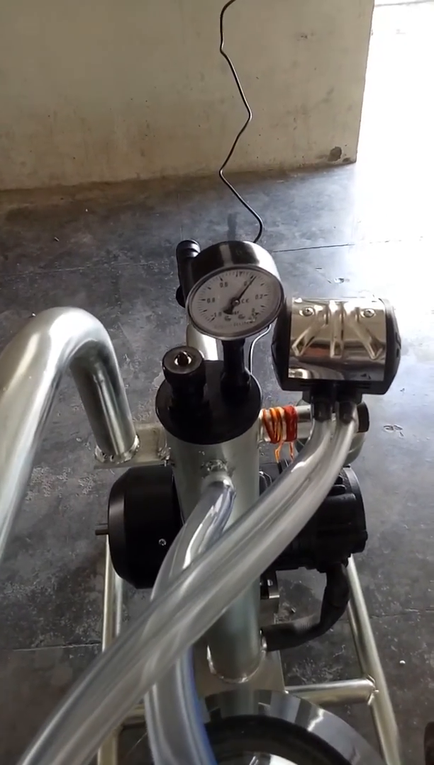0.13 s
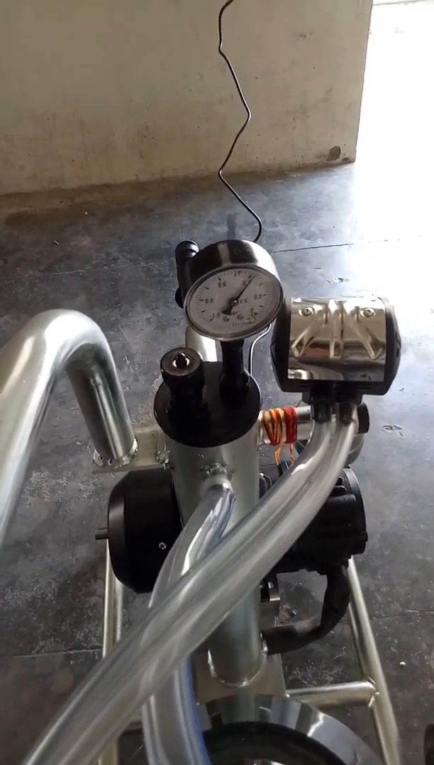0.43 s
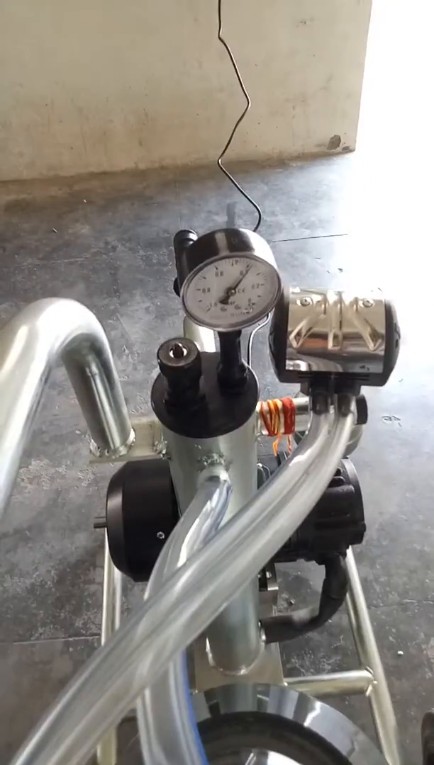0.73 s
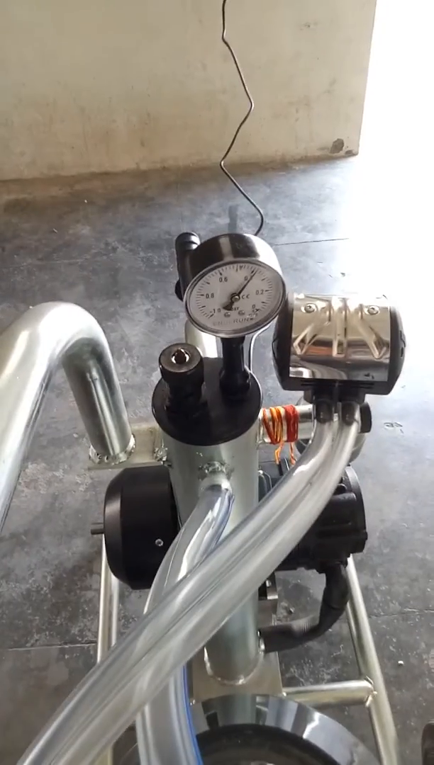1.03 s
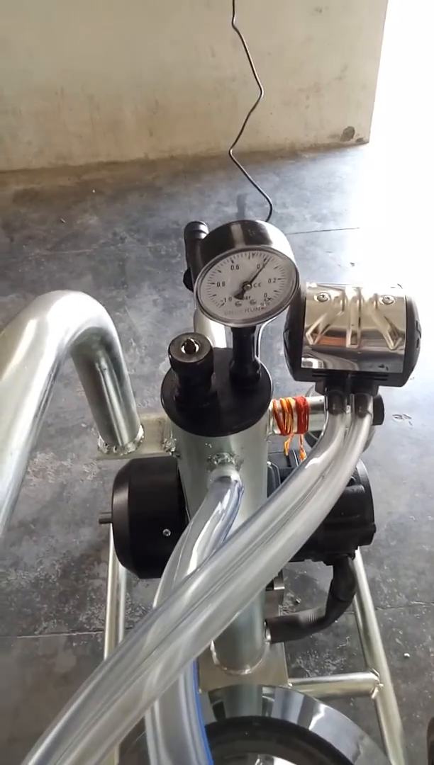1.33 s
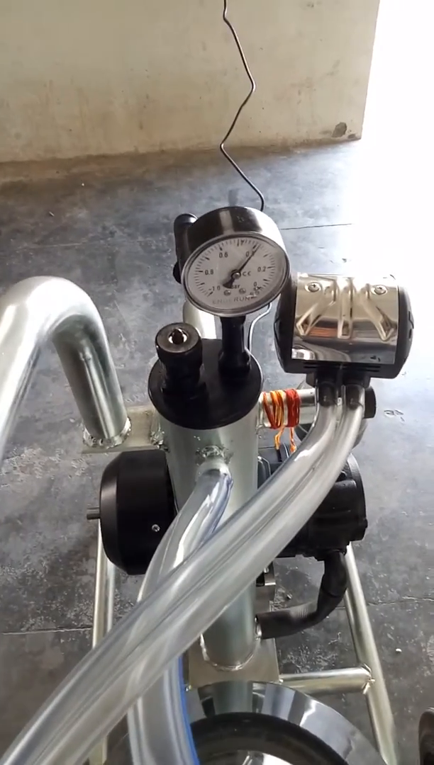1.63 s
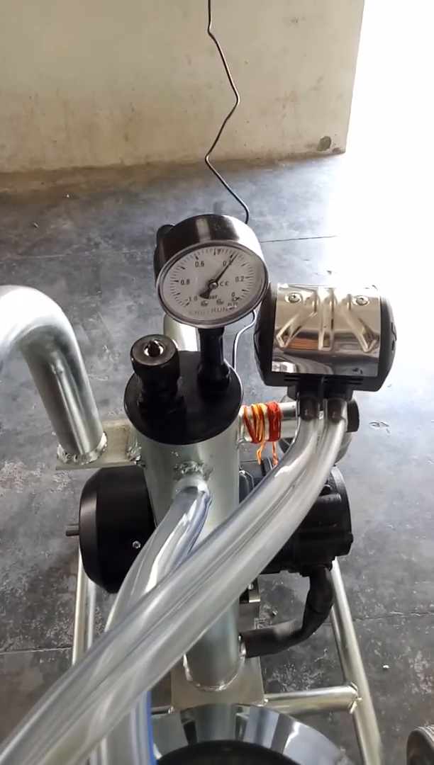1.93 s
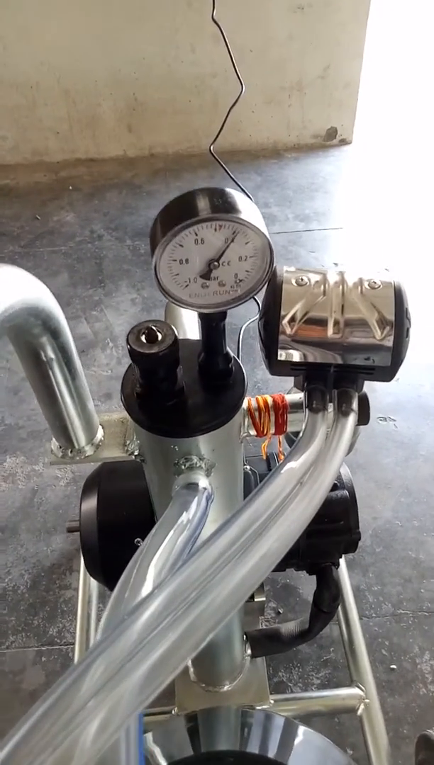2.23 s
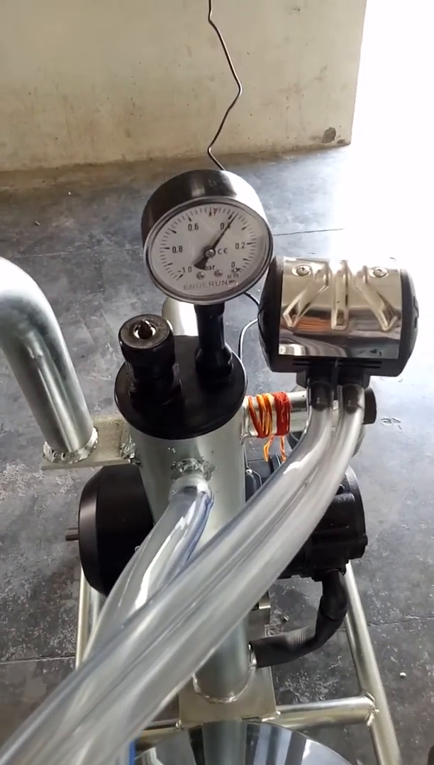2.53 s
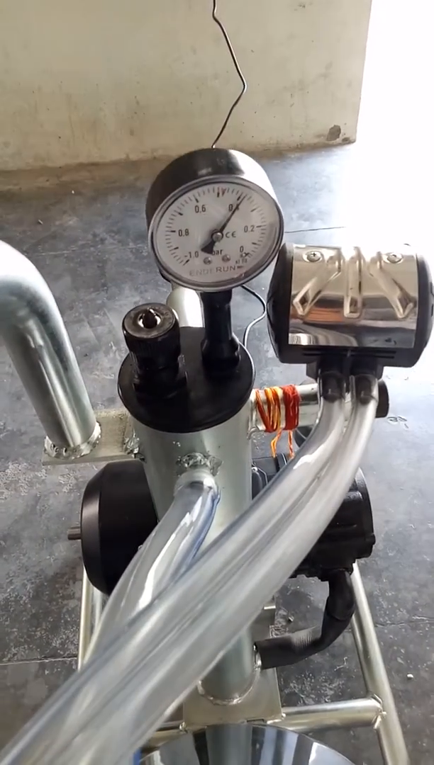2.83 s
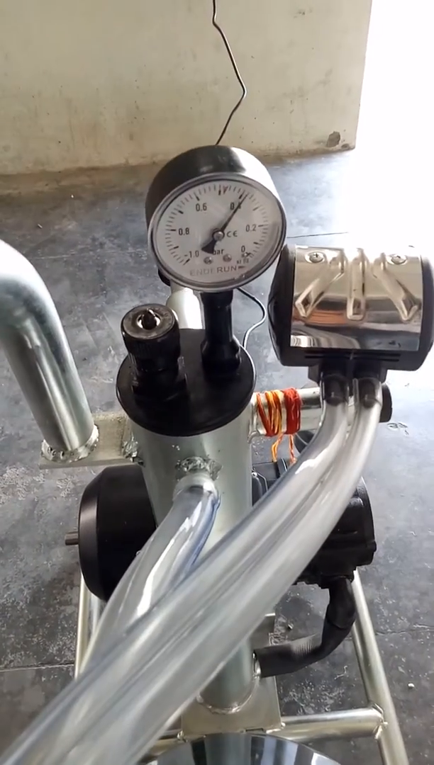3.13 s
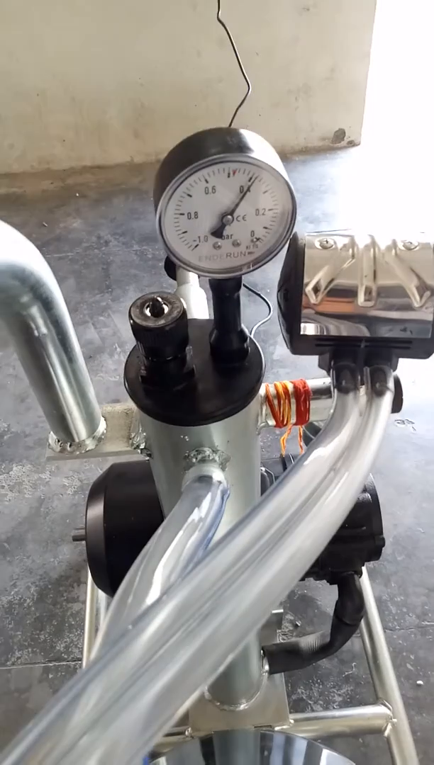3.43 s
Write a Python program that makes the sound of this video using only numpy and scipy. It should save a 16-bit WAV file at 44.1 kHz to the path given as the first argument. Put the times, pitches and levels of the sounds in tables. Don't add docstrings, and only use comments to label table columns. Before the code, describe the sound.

A loud, buzzing vacuum pump runs steadily close by, its regular ticks nearly buried in whine

```python
import sys
import numpy as np
from scipy import signal
from scipy.fft import rfft, irfft, next_fast_len
from scipy.io import wavfile
from scipy.ndimage import uniform_filter1d, minimum_filter1d, map_coordinates

SR = 44100
rng = np.random.default_rng(int(sys.argv[2]) if len(sys.argv) > 2 else 0)


def nominal_scale(level):
    x = np.asarray(level, float) / 20
    return 10 ** x


def materialize(psi):
    bounded = np.clip(np.atleast_2d(psi).T, -1, 1)
    quanta = np.round(bounded * 32767).astype(np.int16)
    wavfile.write(sys.argv[1], SR, quanta)


N = 158760
T_S = np.arange(N) / SR
SHAFT_HZ, VANES = 23.98, 4


def unit(x):
    return x / np.sqrt(np.mean(x ** 2) + 1e-20)


def along(points, hz):
    point_hz, value = np.transpose(points)
    return np.interp(np.log(hz + 1), np.log(point_hz + 1), value)


def sides(pan_db):
    return nominal_scale(np.array([pan_db / 2, -pan_db / 2]))


def wobble(rate_hz):
    knots = rng.standard_normal(int(N * rate_hz / SR) + 4)
    return map_coordinates(knots, [np.arange(N) * rate_hz / SR])


def filtered(x, response):
    m = next_fast_len(N + SR // 4)
    return irfft(rfft(x, m) * response(np.fft.rfftfreq(m, 1 / SR)), m)[..., :N]


def peak(f, hz, width_hz):
    return 1j * f * width_hz / (hz * hz - f * f + 1j * f * width_hz)


def pair(alike):
    def mid_side(f):
        turn = np.arccos(np.clip(alike(f), 0, 1)) / 2
        return np.array([np.cos(turn), np.sin(turn)])
    mid, side = filtered(rng.standard_normal((2, N)), mid_side)
    return np.array([mid + side, mid - side])


# (multiple of shaft rate, level [dB rms], left over right [dB])
STRONG_ORDERS = [(4, -45, 9), (8, -42.5, 6), (11, -56.5, 13), (12, -36.5, 6), (15, -60.5, 12.5),
                 (16, -48, 11), (20, -43.5, -1), (24, -51, -5.5), (25, -54.5, 15), (28, -47.5, 11),
                 (29, -59, 10.5), (30, -56.5, 5.5), (32, -54.5, 7), (40, -60, 1.5), (43, -49.5, -1),
                 (50, -70, 15), (52, -56, 20), (54, -38.5, 15), (55, -41, 25.5), (56, -41.5, -8),
                 (57, -41, 17.5), (58, -47.5, 22.5)]
WEAK_DB, WEAK_SPREAD_DB, WEAK_PAN_DB = -69, 0.5, 11
PULSE_START_RAD, PULSE_SMEAR_RAD = 1.5, .1
LOW_SWAY_DB, HIGH_SWAY_DB, PHASE_SWAY_RAD = 1.2, 1.2, .35


def vanes():
    angle = 2 * np.pi * SHAFT_HZ * T_S
    out = np.zeros((2, N))
    strong = {round(k): (db, pan_db) for k, db, pan_db in STRONG_ORDERS}
    for k in range(2, 64):
        luck_db, start, skew = rng.normal(), rng.uniform(0, 2 * np.pi), rng.normal()
        db, pan_db = strong.get(k, (WEAK_DB + WEAK_SPREAD_DB * luck_db, WEAK_PAN_DB))
        if k % VANES == 0:
            harmonic = k / VANES
            start = PULSE_START_RAD * harmonic + PULSE_SMEAR_RAD * harmonic ** 2
        high = (k / 56) ** 2
        level = nominal_scale(db + (LOW_SWAY_DB + HIGH_SWAY_DB * high) * wobble(9))
        drift = PHASE_SWAY_RAD * high * wobble(7)
        left_lead = np.array([[2 * skew * high], [0]])
        tone = np.sqrt(2) * np.cos(k * angle + start + drift + left_lead)
        out += level * sides(pan_db)[:, None] * tone
    return out


# (frequency [Hz], width [Hz], level [dB rms], drift as the phone moves [dB/s])
CASING_MODES = [(1322, 28.5, -36, -1.22), (1425, 47.3, -40, -3.22), (1610.7, 17.4, -40.5, 0),
                (1938.4, 23, -40, 0), (2131.7, 40.6, -39.5, -1), (4127.1, 37.6, -21, -2.43),
                (4218, 94, -30.5, -0.26), (4341.8, 12.5, -31, 0), (4387.3, 17, -25.5, -2),
                (5029.2, 65.2, -26.5, -1.28), (5130, 70, -30, 1.33), (5166, 8.9, -32.5, 0.37),
                (6344, 19.7, -46, -3.33), (6624, 38.4, -44.5, -0.35), (7072, 31.4, -48.5, 1.68)]
CASING_PANS_DB = [12, 6, 6, 8, 10, 2, 1, 3, 0, 3, 4, -8, 9, 8, 8]
CASING_ALIKE, TURN_DEPTH, MODE_SWAY_DB = .6, 0.126, 1.3145
TURN_AWAY_DB_PER_S = 1


def casing():
    from_middle_s = T_S - T_S.mean()
    turn = 1 + TURN_DEPTH * np.cos(2 * np.pi * SHAFT_HZ * T_S)
    scrape = pair(lambda f: CASING_ALIKE + 0 * f) * turn
    out = np.zeros((2, N))
    for k, (mode, pan_db) in enumerate(zip(CASING_MODES, CASING_PANS_DB)):
        hz, width_hz, db, drift_db = mode
        sign = (-1) ** k
        ring = unit(filtered(scrape, lambda f: sign * peak(f, hz, width_hz) * peak(f, hz, 12 * width_hz)))
        pan = sides(pan_db + 2 * TURN_AWAY_DB_PER_S * (hz > 4000) * from_middle_s)
        out += ring * pan * nominal_scale(db + drift_db * from_middle_s + MODE_SWAY_DB * wobble(2.466))
    return out


# (time [s], level [dB])
VALVE_TICKS = [
    (.145, -16),
    (.6643, -16.5),
    (1.212, -15),
    (1.7304, -15),
    (2.2776, -15.5),
    (2.7964, -17),
    (3.3437, -17.5),
]
# (frequency [Hz], width [Hz], level [dB])
VALVE_MODES = [(2353, 580, -7), (3089, 176, -8), (3382, 210, -5.5), (3565, 280, -1.5), (4250, 335, 3.5)]
# (delay [s], level [dB])
SEAT_BOUNCES = [
    (.0022, -7),
    (.0048, -8),
    (.0095, -11),
    (.015, -14),
]
VALVE_BAND_HZ, VALVE_BAND_WIDTH_HZ = 3200, 2600
TICK_PAN_DB, TICK_DB, TICK_ROOM_DB, ROOM_T60_S = 8, 20, -1, 0.163


def pulsator():
    blows = np.zeros((2, N))
    t = np.arange(SR // 5) / SR
    for time_s, db in VALVE_TICKS:
        slap = np.zeros(len(t))
        for delay_s, level_db in [(0.00223, 0.0095)] + SEAT_BOUNCES:
            slap[round(delay_s * SR)] = nominal_scale(level_db + 2 * rng.normal())
        tail = rng.standard_normal((2, len(t))) * nominal_scale(-60 * t / ROOM_T60_S) * (t > .003)
        room = nominal_scale(TICK_ROOM_DB) * tail / np.linalg.norm(tail[0])
        sound = slap * sides(TICK_PAN_DB)[:, None] + room
        i = round(time_s * SR)
        blows[:, i:i + len(t)] += nominal_scale(db + TICK_DB) * sound[:, :N - i]

    def body(f):
        modes = sum((-1) ** k * nominal_scale(db) * peak(f, hz, width_hz)
                    for k, (hz, width_hz, db) in enumerate(VALVE_MODES))
        return peak(f, VALVE_BAND_HZ, VALVE_BAND_WIDTH_HZ) ** 2 * modes
    return nominal_scale(20) * filtered(blows, body)


def snap(time_s=2.1075, level_db=-5, pan_db=15):
    click = np.zeros(N)
    click[round(time_s * SR)] = -nominal_scale(level_db)
    return sides(pan_db)[:, None] * filtered(click, lambda f: peak(f, 9000, 24300))


# (frequency [Hz], width [Hz], level over the hiss [dB])
PIPE_HUMPS = [(993, 46, 3.5), (2155, 492, 8.5), (3374, 323, 3.5), (4110, 590, 1.5), (6091, 101, 12),
              (8873, 167, 7.5), (11345, 1430, 5.5)]
# (frequency [Hz], density [dB/Hz])
RUMBLE_SPECTRUM = [(25, -22), (70, -6), (250, 2), (800, -0.5), (1500, 5.5), (2800, 2), (4400, 10),
                   (5600, 6)]
# (frequency [Hz], density [dB/Hz])
HISS_SPECTRUM = [(4000, -26.5), (5600, -5.5), (7000, -1), (8300, -6), (9250, -9.5), (9650, -14.5),
                 (12500, -16), (15300, -18)]
# (frequency [Hz], left over right [dB])
AIR_LEAN = [(60, -4.5), (400, 5.5), (1300, 6.5), (3500, 8.5), (4600, -1.5), (8300, 7.5), (13500, 10),
            (15000, 11)]
# (frequency [Hz], likeness [0-1])
AIR_ALIKE = [(60, 1), (400, 0.86), (900, 0.176), (2000, 0.361), (3000, 0.16), (12000, 0.108)]
RUMBLE_DB, HISS_DB, RIGHT_LAG_S = -25, -33.5, 0.0002206


def air(spectrum, level_db, gate, sway_db):
    puff = 1 + gate * np.cos(2 * np.pi * VANES * SHAFT_HZ * T_S)
    closed_spectrum = spectrum + [(1.3 * spectrum[-1][0], -60)]

    def colour(f):
        power = sum(np.abs(nominal_scale(db) * peak(f, hz, width_hz)) ** 2 for hz, width_hz, db in PIPE_HUMPS)
        lag = np.exp(-2j * np.pi * f * RIGHT_LAG_S * np.array([[0], [1]]))
        return nominal_scale(along(closed_spectrum, f)) * np.sqrt(1 + power) * sides(along(AIR_LEAN, f)) * lag
    noise = puff * pair(lambda f: along(AIR_ALIKE, f))
    return nominal_scale(level_db + sway_db * wobble(5.678)) * unit(filtered(noise, colour))


HAND_HZ, HAND_DB = 26, -70.5
THUMP_S, THUMP_DB, THUMP_LENGTH_S = 3.34, -47, 0.0204


def hand():
    thump = nominal_scale(THUMP_DB) * np.exp(-((T_S - THUMP_S) / THUMP_LENGTH_S) ** 2)
    level = nominal_scale(HAND_DB + 3.9 * wobble(12)) + thump
    rumble = unit(filtered(pair(lambda f: .4 + 0 * f), lambda f: peak(f, HAND_HZ, 35) ** 2))
    return sides(6)[:, None] * level * rumble


def scene():
    rumble = air(RUMBLE_SPECTRUM, RUMBLE_DB, gate=0.1, sway_db=-0.41)
    hiss = air(HISS_SPECTRUM, HISS_DB, gate=0.128, sway_db=-0.09)
    return vanes() + casing() + pulsator() + snap() + rumble + hiss + hand()


def low_pass(x):
    return signal.sosfilt(signal.butter(12, 15410, fs=SR, output="sos"), x)


# (time [s], length [s], bass loss [dB])
WIND_CUTS = [
    (0.254, 0.061, 18.5),
    (1.235, 0.085, 17),
    (1.479, 0.043, 17),
]
CUT_HZ, TOP_HZ = 176, 15350
DULLING_DB_PER_S, DULL_HZ = -0.52, 12340
SQUEEZE, CEILING_DB, MAKEUP_DB = .65, -10.5, 8.5
AHEAD_S, HOLD_S, RELEASE_S, GLIDE_S = .018, .012, .045, .013


def record(dry):
    loss_db = sum(db * np.clip(np.minimum(T_S - s, s + length_s - T_S) / 0.0112, 0, 1)
                  for s, length_s, db in WIND_CUTS)
    bass = filtered(dry, lambda f: 1 / (1 + (f / CUT_HZ) ** 4))
    top = filtered(dry, lambda f: 1 - 1 / (1 + (f / DULL_HZ) ** 10))
    dull_gain = nominal_scale(DULLING_DB_PER_S * T_S ** 2 / T_S.mean())
    x = nominal_scale(MAKEUP_DB) * (dry - bass * (1 - nominal_scale(-loss_db)) - top * (1 - dull_gain))

    over_db = np.maximum(20 * np.log10(np.abs(x).max(0) + 1e-9) - CEILING_DB, 0)
    ahead, hold, glide = round(AHEAD_S * SR), round(HOLD_S * SR), round(GLIDE_S * SR)
    held_db = np.roll(minimum_filter1d(-SQUEEZE * over_db, size=ahead + hold), (hold - ahead) // 2)
    keep = np.exp(-1 / (RELEASE_S * SR))
    mean_db = held_db.mean()
    slow_db = signal.lfilter([1 - keep], [1, -keep], held_db - mean_db) + mean_db
    gain = nominal_scale(uniform_filter1d(np.minimum(held_db, slow_db), size=glide))
    return low_pass(filtered(x * gain, lambda f: f < TOP_HZ))


dry = scene()
out = record(dry)
materialize(out)
```